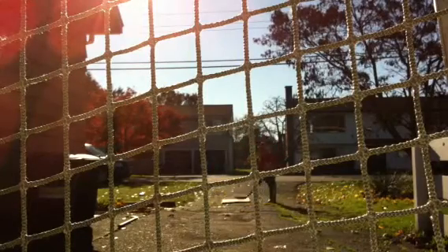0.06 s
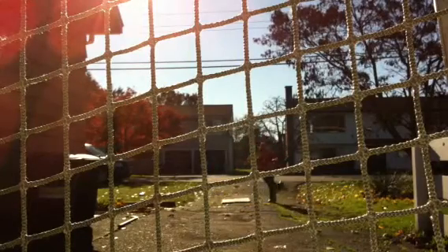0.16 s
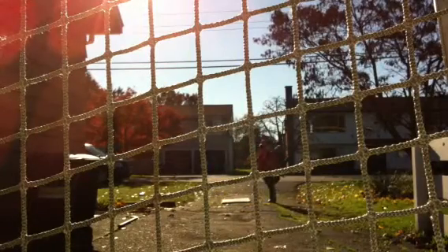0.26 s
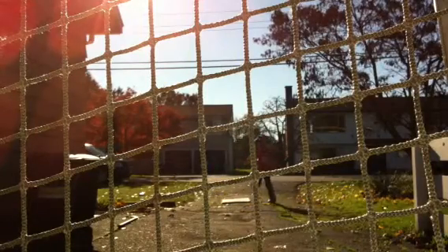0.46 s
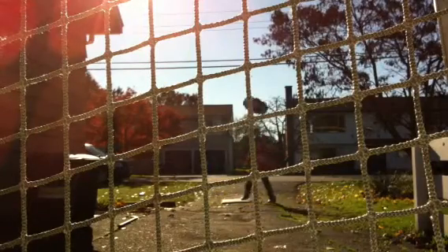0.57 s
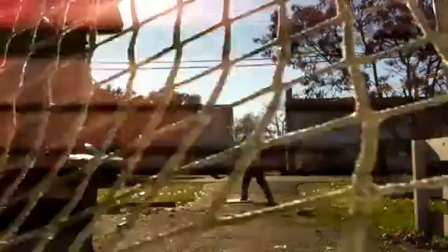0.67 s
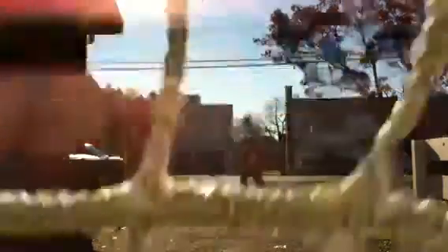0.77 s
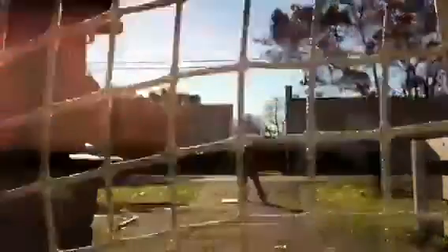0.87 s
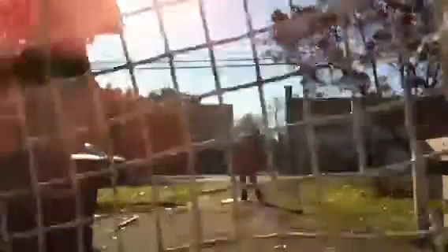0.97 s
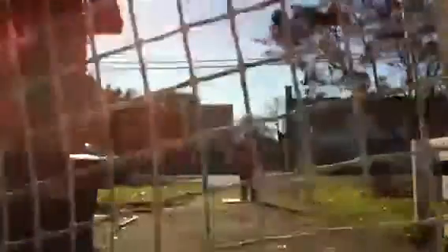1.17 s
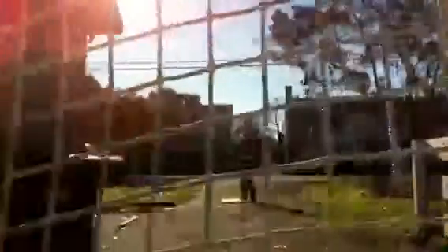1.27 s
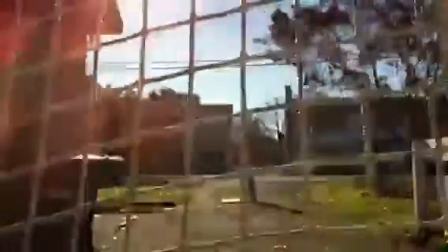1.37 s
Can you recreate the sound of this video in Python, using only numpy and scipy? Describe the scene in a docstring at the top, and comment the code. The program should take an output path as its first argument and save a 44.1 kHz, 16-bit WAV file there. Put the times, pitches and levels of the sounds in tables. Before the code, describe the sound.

A hockey slapshot on a driveway, heard from inside the goal. After quiet outdoor air, the blade slaps the ground and cracks woodily into the puck at 0.24 s, with quick echoes and a fading tail off houses. A faint low whir approaches around 0.65 s. At 0.8 s the puck thuds into the close net; cords hiss, with knocks from 1.02 to 1.25 s, then fading rustle.

```python
"""Driveway, inside the goal: a slapshot slaps the ground, cracks into the puck, and the houses answer.
Stick: damped modes plus noise bursts. Scatter and echoes: shaped, decaying noise.
The puck whirs closer (gliding sine) and thuds into the net (modes); its cords hiss and rattle (grainy noise).
Knocks follow as the puck drops in the shaking goal, over quiet outdoor noise."""
import sys
import numpy as np
from scipy import signal
from scipy.fft import rfft, irfft, next_fast_len
from scipy.io import wavfile
from scipy.ndimage import map_coordinates

SR = 44100
rng = np.random.default_rng(int(sys.argv[2]) if len(sys.argv) > 2 else 0)


def waveform_to_disk(signal):
    """Save audio, clipped to [-1, 1], as 16-bit WAV at the path in sys.argv[1]."""
    frames = np.transpose(np.atleast_2d(signal))
    scaled = np.clip(frames, -1, 1) * 32767
    samples = np.round(scaled).astype(np.int16)
    wavfile.write(sys.argv[1], SR, samples)


N = 61739
T = np.arange(N) / SR


def amp(db):
    """Decibels to gain."""
    return 10 ** (np.asarray(db) / 20)


def unit(x):
    """Scale to rms 1."""
    return x / np.sqrt(np.mean(x ** 2) + 1e-20)


def along(points, hz):
    """Interpolate (frequency [Hz], value) points on a log-frequency axis."""
    point_hz, values = np.transpose(points)
    return np.interp(np.log(hz + 1), np.log(point_hz + 1), values)


def curves(rows):
    """One value per sample for each column after the time."""
    time_s, *columns = np.transpose(rows)
    return [np.interp(T, time_s, column) for column in columns]


def wobble(knots_per_s):
    """Smooth random curve through normally distributed knots."""
    return map_coordinates(rng.standard_normal(2000), [T * knots_per_s], mode="mirror")


def filtered(x, response):
    """Multiply the spectrum of x by a response of frequency."""
    m = next_fast_len(N + 8192)
    return irfft(rfft(x, m) * response(np.fft.rfftfreq(m, 1 / SR)), m)[:N]


def coloured(x, spectrum):
    """Filter x by a (frequency [Hz], level [dB]) spectrum, to rms 1."""
    return unit(filtered(x, lambda hz: amp(along(spectrum, hz))))


def noise(spectrum):
    """Coloured noise of rms 1."""
    return coloured(rng.standard_normal(N), spectrum)


def low_cut(x, hz):
    """Causal high-pass, fourth order."""
    return signal.sosfilt(signal.butter(4, hz, "highpass", fs=SR, output="sos"), x)


def burst(peak_s, t60_s, rise_s=.0003):
    """Envelope: Gaussian swell to peak_s, then exponential decay."""
    decay = amp(-60 * np.maximum(T - peak_s, 0) / t60_s)
    return np.where(T < peak_s, np.exp(-((T - peak_s) / rise_s) ** 2), decay)


def puff(source, peak_s, db, t60_s, rise_s=0.00037):
    """Noise burst with the energy that its level and envelope imply."""
    shape = burst(peak_s, t60_s, rise_s)
    x = source * shape
    return amp(db) * x * np.linalg.norm(shape) / (np.linalg.norm(x) + 1e-12)


def ring(start_s, modes, rise_s, rough_rad=.3):
    """Damped modes struck at start_s, phases wandering by rough_rad."""
    t = np.maximum(T - start_s, 0)
    tones = 0
    for hz, db, t60_s in modes:
        phase = 2 * np.pi * hz * t + rough_rad * wobble(250)
        tones = tones + amp(db - 60 * t / t60_s) * np.sin(phase)
    return tones * (1 - np.exp(-t / rise_s))


# outdoor background colour: (frequency [Hz], level [dB])
AIR_COLOUR = [(25, -22), (60, -17), (120, 1), (200, 1.5), (400, -3), (850, -0.5), (1300, -6.5), (2000, -15),
              (4000, -18), (8000, -24), (15800, -29)]
# background level: (time [s], level [dB])
AIR_LEVEL = [(0, -52), (.1, -51.5), (.22, -55), (.55, -55.5), (.75, -54.5), (1.4, -53)]


def air():
    """Distant traffic and breeze: coloured noise, level slowly wandering."""
    level_db, = curves(AIR_LEVEL)
    return noise(AIR_COLOUR) * amp(level_db + 0.84 * wobble(24.87))


# far tail colour: (frequency [Hz], level [dB])
TAIL_COLOUR = [(120, -14), (200, 1), (300, 4), (420, 0), (700, 5.5), (1100, 1), (1700, 1), (2600, -1.5),
               (4200, -7), (6500, -19), (12000, -26)]
# far tail decay: (frequency [Hz], t60 [s])
TAIL_DECAY = [(150, 0.4), (1000, 0.79), (2500, 0.88), (5000, .5), (12000, 0.67)]
# wall echo colour: (frequency [Hz], level [dB])
WALL_COLOUR = [(200, -5), (700, 0), (1100, -3), (1700, 2), (2600, -11), (5000, -19), (12000, -34)]
# echoes off the houses: (time [s], level [dB], t60 [s])
ECHOES = [(.279, -37, .02), (.292, -37, .03), (.364, -44.5, .025)]
TAIL_DB = -40.2
SNAP_S = .2460  # hard first touch of blade and puck


def houses():
    """Distinct echoes as noise bursts; diffuse tail as noise, each band with its own decay."""
    hz, t, bands = signal.stft(noise(TAIL_COLOUR), SR, nperseg=256)
    fade = amp(-60 * np.maximum(t - SNAP_S, 0) / along(TAIL_DECAY, hz)[:, None])
    tail = signal.istft(bands * fade, SR, nperseg=256)[1][:N]
    onset = 1 - np.exp(-np.maximum(T - SNAP_S, 0) / .015)
    echoes = sum(puff(noise(WALL_COLOUR), s, db, t60_s, .002) for s, db, t60_s in ECHOES)
    return amp(TAIL_DB) * tail * onset + echoes


# near scatter colour: (frequency [Hz], level [dB])
NEAR_COLOUR = [(100, -6), (220, 0), (420, -6), (700, -2), (1600, 0), (4000, -2), (6000, 4), (12000, -2)]
NEAR_DB, NEAR_T60_S = -11.3, .15


def yard(x):
    """Scatter off driveway and nearby walls: x convolved with decaying noise of unit energy."""
    near = noise(NEAR_COLOUR) * burst(0.013, NEAR_T60_S, .005)
    return amp(NEAR_DB) * signal.fftconvolve(x, near / np.linalg.norm(near))[:N]


# spinning puck in flight: (time [s], pitch [Hz], level [dB])
WHIR = [(.57, 400, -77), (.605, 394, -60), (.64, 392, -56.5), (.696, 359.3, -46), (.712, 337, -46),
        (.728, 298, -60), (.74, 289, -46), (.76, 290, -55), (.774, 310, -48), (.80, 315, -51),
        (.82, 305.5, -71)]
# faint scuffs before the catch: (time [s], level [dB], t60 [s])
SCUFFS = [(.7665, -47, .04), (.7805, -50, 0.011)]
# crack colour, also used for the scuffs: (frequency [Hz], level [dB])
CRACK_COLOUR = [(40, -14), (160, -27), (300, 1), (800, 1.5), (1400, -0.5), (2200, -1), (3300, -2),
                (4500, -6.5), (5600, -17), (9000, -22), (15000, -31)]


def flight():
    """Spinning puck: an unsteady sine sinks in pitch, then lifts slightly; faint noise scuffs."""
    hz, level_db = curves(WHIR)
    phase = 2 * np.pi * np.cumsum(hz) / SR + .2 * wobble(90)
    whir = np.sqrt(2) * amp(level_db) * np.sin(phase) * amp(1.5 * wobble(70))
    in_flight = (T > WHIR[0][0]) * (T < WHIR[-1][0])
    return whir * in_flight + sum(puff(noise(CRACK_COLOUR), *row) for row in SCUFFS)


# single bumps of the puck: (time [s], level [dB], frequency [Hz], t60 [s])
BUMPS = [(1.021, -33, 189, 0.042), (1.054, -33, 270, .05), (1.1378, -10.5, 850, .005),
         (1.2465, -28, 300, 0.024), (1.25, -44, 215, 0.12)]
# knocks and clatter of the shaking goal:
# (time [s], level [dB], rise [s], t60 [s], centre [Hz], width [octaves])
KNOCKS = [(.805, -25, 0.0033, 0.035, 1500, .8), (1.021, -25, 0.0014, 0.052, 1600, 1.2),
          (1.025, -24.5, .002, 0.015, 3480, 0.1), (1.029, -35, .005, .02, 480, 0.54),
          (1.0445, -30, 0.0018, .02, 1750, .5), (1.054, -26, .002, 0.018, 1000, 0.83),
          (1.057, -25, 0.00075, 0.01, 1700, .45), (1.064, -38, .002, .08, 900, 1),
          (1.1168, -35, 0.0017, .03, 800, 1.7), (1.138, -29, 0.00027, .006, 3000, 1),
          (1.156, -33.5, .001, 0.027, 750, 0.82), (1.364, -46, .002, .025, 400, 1.2)]


def rattle():
    """Puck drops in the shaking goal: single-mode bumps and band-limited noise knocks."""
    out = sum(amp(db) * ring(s, [(hz, 0, t60_s)], .001) for s, db, hz, t60_s in BUMPS)
    for s, db, rise_s, t60_s, centre_hz, width_oct in KNOCKS:
        def resonance(hz):
            return 1 / (1 + (np.log2((hz + 1) / centre_hz) / width_oct) ** 2)

        body = filtered(rng.standard_normal(N), resonance)
        out = out + puff(body, s, db, t60_s, rise_s)
    return out


# taut net modes: (frequency [Hz], level [dB], t60 [s])
MESH = [(300.7, -10, 0.084), (647, 2, .065), (702, -5, 0.1), (928, -1, .065), (1287, -3, .05),
        (1407, -9, 0.068), (1610, -8, 0.042), (1902, 2.5, .05), (2014, -3.5, 0.074)]
# groan colour of frame and cords: (frequency [Hz], level [dB])
GROAN_COLOUR = [(50, -37), (150, -15.5), (290, -1.5), (420, -5), (660, 1), (770, -3), (920, 0.5),
                (1080, -3), (1350, -3.5), (1900, -2.5), (2500, -10.5), (4000, -16), (8000, -27)]
# surges of the pull: (time [s], level [dB], t60 [s])
PULLS = [(.801, -29, .14), (.823, -30, 0.11), (.85, -37, 1.3)]
# sliding cords: (time [s], level [dB])
SLIDE = [(.795, -81), (.80, -35), (.812, -31.5), (.828, -25.5), (.84, -29), (.849, -31), (.89, -32),
         (.96, -36), (1.0, -35.5), (1.045, -33.5), (1.075, -36), (1.13, -38.5), (1.17, -40), (1.22, -43),
         (1.27, -50), (1.29, -45.5), (1.325, -47), (1.36, -47.5), (1.4, -43.5)]
# cord hiss colour: (frequency [Hz], level [dB])
HISS_COLOUR = [(500, -19), (1500, 1), (2600, -1.5), (4500, 2), (7500, -2), (9500, 0), (11000, -2),
               (13000, 0.5), (15800, -3.5)]
# cords slipping over one another: (time [s], level [dB], t60 [s])
SLIPS = [(1.022, -27, 0.043), (1.119, -34, 0.023), (1.139, -36, .02), (1.1655, -35, .015),
         (1.2, -36.5, 0.016), (1.2453, -36.5, .012), (1.285, -41.5, .025), (1.38, -53, .012)]
# first touch of the cords: (time [s], level [dB], t60 [s])
CATCH_TICK = (.7978, -30.5, 0.0044)
# colour of first touch and blade scrape: (frequency [Hz], level [dB])
GRIT_COLOUR = [(800, -8), (2500, 0), (5000, 4), (7000, 0), (11000, -1), (15800, -2)]
CATCH_S, CATCH_DB, CATCH_RISE_S = .7995, -23.5, .004
GRAINS_PER_S, GRAIN_SPREAD_DB, FLUTTER_DB = 7000, 2, 1.14


def net():
    """Mesh snaps taut (modes), groans (noise surges), fibres hiss in countless tiny slips (grains)."""
    tick = puff(noise(GRIT_COLOUR), *CATCH_TICK)
    thud = amp(CATCH_DB) * ring(CATCH_S, MESH, CATCH_RISE_S, rough_rad=.7)
    surges = sum(puff(noise(GROAN_COLOUR), s, db, t60_s, 0.0024) for s, db, t60_s in PULLS)
    groan = surges * amp(1.06 * wobble(69.83))
    grain_on = rng.random(N) < GRAINS_PER_S / SR
    grain_gain = amp(GRAIN_SPREAD_DB * rng.standard_normal(N))
    grains = grain_on * rng.standard_normal(N) * grain_gain
    fibres = coloured(unit(grains) + 1.32 * rng.standard_normal(N), HISS_COLOUR)
    slide_db, = curves(SLIDE)
    hiss = fibres * amp(slide_db + FLUTTER_DB * wobble(160)) * (T > SLIDE[0][0])
    slips = sum(puff(noise(HISS_COLOUR), s, db, t60_s, 0.0011) for s, db, t60_s in SLIPS)
    return tick + thud + groan + hiss + slips


# blade modes: (frequency [Hz], level [dB], t60 [s])
BLADE = [(236, -19, .07), (297, -40, .65), (341, -8, 0.046), (409, -1, .052), (615, -6, .06),
         (786, .5, .058), (969, -12, .09), (1400, -15, 0.052), (1700, -15, 0.052)]
SLAP_S, SLAP_DB, BLADE_RISE_S = .2362, -10, 0.0023


def slap():
    """Blade slaps the ground just behind the puck: low damped modes."""
    return amp(SLAP_DB) * low_cut(ring(SLAP_S, BLADE, BLADE_RISE_S, rough_rad=.15), hz=110)


# dead modes of the snap: (frequency [Hz], level [dB], t60 [s])
SNAP = [(1800, 0, .0033), (3200, -5, .006)]
# hard contacts of blade with ground and puck: (time [s], level [dB], t60 [s])
CRACKS = [(.2363, -26, 0.048), (.2465, -21, 0.023), (.2488, -24.5, 0.055), (.2513, -22, .02),
          (0.2589, -26.5, 0.045)]
# stick modes rung by the puck: (frequency [Hz], level [dB], t60 [s])
SHAFT = [(1222, -11, 0.096), (1627, 3, 0.098), (1710, -1, 0.14), (1800, -7, 0.088), (2002, -0.5, 0.13),
         (2086, -5, .13), (2357, 0.5, .09), (2710, -3.5, .1), (3230, 0, 0.071), (3420, -7, 0.08),
         (3984, -8, .11), (4364, -3.5, 0.087)]
# blade scraping the ground: (time [s], level [dB], rise [s], t60 [s])
SCRAPE = (.2565, -32, 0.012, 0.0246)
SNAP_DB, SHAFT_DB = -4, -30


def crack():
    """Blade snaps into the puck (dead modes, noise), rings the shaft (modes), scrapes on (noise)."""
    snap = amp(SNAP_DB) * ring(SNAP_S, SNAP, .00002, rough_rad=0)
    cracks = sum(puff(noise(CRACK_COLOUR), s, db, t60_s) for s, db, t60_s in CRACKS)
    shaft = amp(SHAFT_DB) * ring(SNAP_S, SHAFT, .0005, rough_rad=0.84)
    s, db, rise_s, t60_s = SCRAPE
    scrape = puff(noise(GRIT_COLOUR), s, db, t60_s, rise_s)
    # the snap starts with negative polarity
    return low_cut(cracks + shaft, hz=60) - low_cut(snap, hz=55) + scrape


BLADE_WET_DB = -7  # the low slap carries less into the yard than the crack
GOAL_LOW_CUT_HZ = 160  # the light goal carries no deep bass


def scene():
    """Distant shot with its echoes, puck in flight, goal close by, background."""
    low, sharp = slap(), crack()
    shot = low + sharp + yard(sharp + amp(BLADE_WET_DB) * low) + houses()
    goal = low_cut(net() + rattle(), GOAL_LOW_CUT_HZ)
    return (shot + flight() + goal + air())[None]


TOP_HZ = 16000


def record(dry):
    """Brick-wall band limit at TOP_HZ."""
    return filtered(dry[0], lambda hz: hz < TOP_HZ)[None]


dry = scene()
out = record(dry)
waveform_to_disk(out)
```